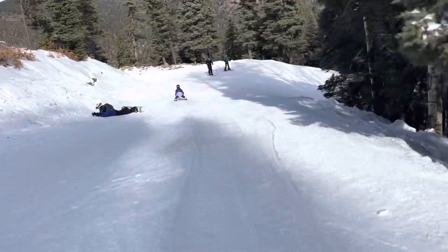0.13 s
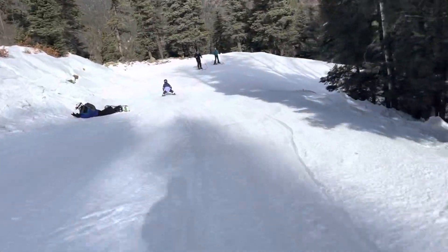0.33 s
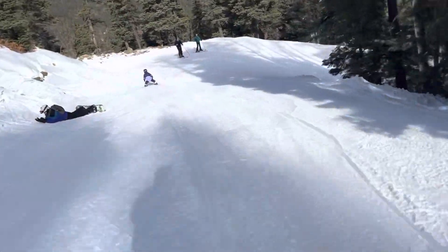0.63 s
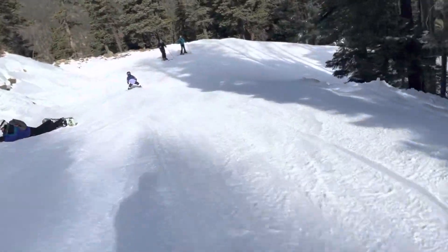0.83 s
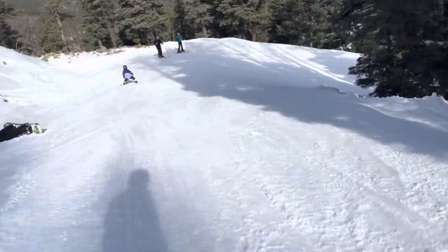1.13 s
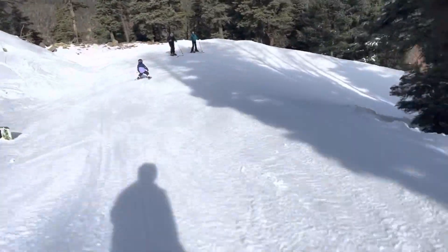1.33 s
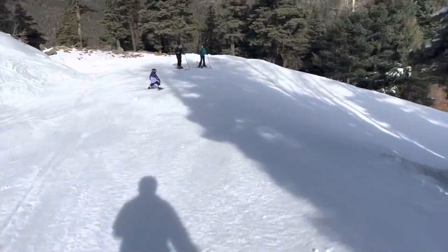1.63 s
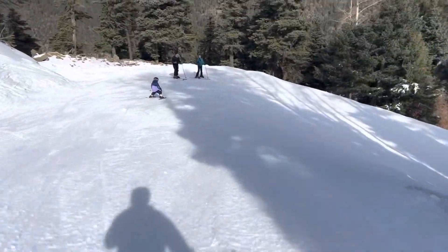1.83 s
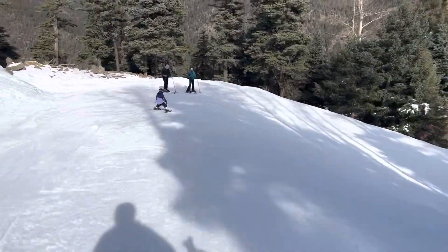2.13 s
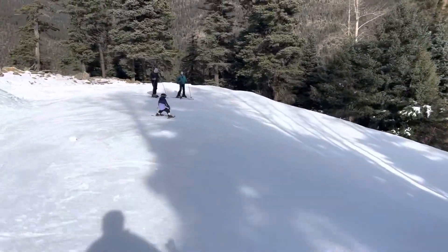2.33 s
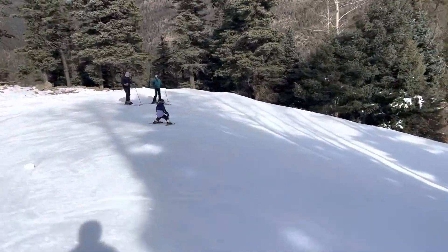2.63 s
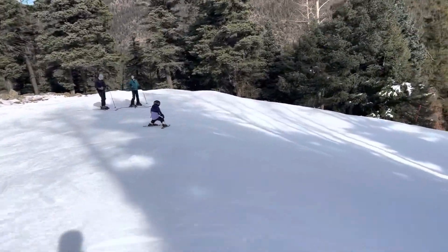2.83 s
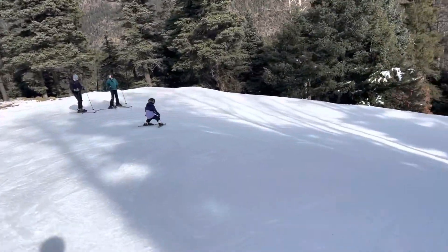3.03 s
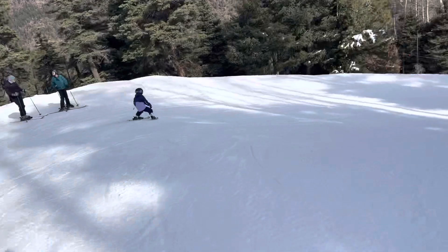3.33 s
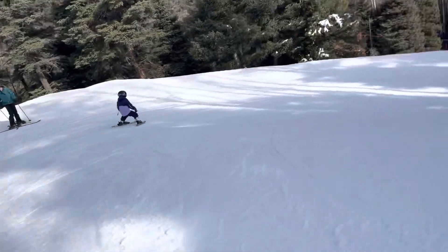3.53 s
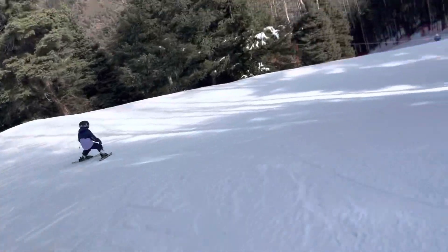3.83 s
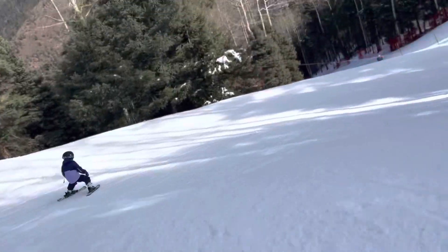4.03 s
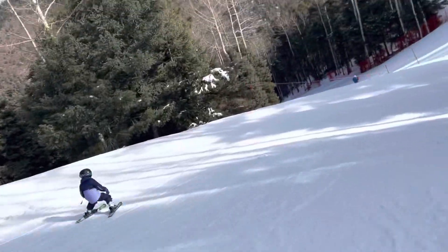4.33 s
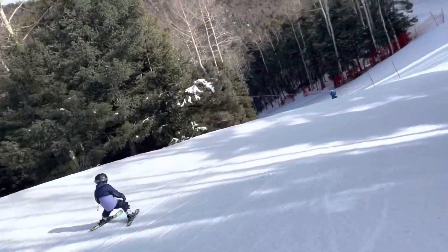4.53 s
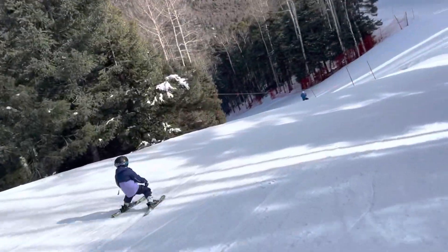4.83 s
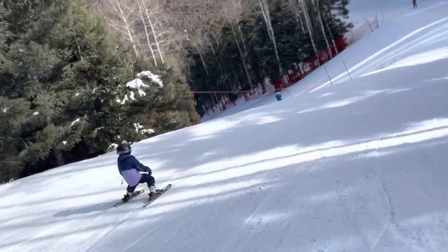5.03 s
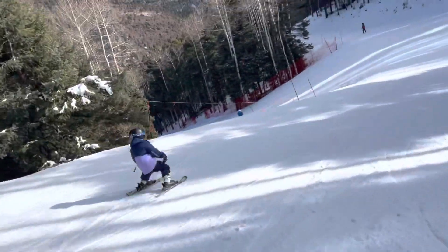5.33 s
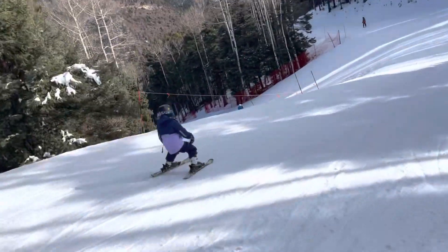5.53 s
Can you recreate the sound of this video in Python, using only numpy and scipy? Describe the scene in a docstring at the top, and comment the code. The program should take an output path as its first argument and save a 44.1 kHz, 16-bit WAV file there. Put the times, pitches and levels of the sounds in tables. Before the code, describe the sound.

Outdoors on a snowy slope, dry and close, heard through a hand-held stereo microphone carried by a skier. From 0 to 1.5 s skis hiss and scrape on grainy snow in short pressed turns, with dull hollow knocks on packed lumps around 0.6 to 1.15 s, crunchy edge bites and soft wind thumps. From about 1.7 s a longer skid builds, densest between 2.0 and 2.55 s, with coarse crunches, bright scratches and ice spray, while wind rises. From 2.7 to about 4.3 s wind dominates: a low rumbling, fluttering roar with hard buffets and abrupt rasps on the right; the skis are mostly a faint hiss, with a small gear clack near 3.55 s. The wind then dies away, with low thumps near 4.8 s. From 4.9 s to the end at about 5.7 s, strong gritty scraping returns, with crunches, a lump knock and thin icy squeaks around 5.2 to 5.3 s.

```python
"""Skis on grainy snow, wind at the microphone

Close by a hand-held camera with two microphone ports, skis hiss and scrape down a groomed slope: filtered
noise and grain clicks, pressed harder in each turn. They slap lumps (damped tones), bite on ridges (bursts
of coarse grain) and squeak on ice (narrow noise); hard bits click and gear clacks. Wind, two colours of
unsteady noise, buffets the ports, swells to a roar on the fast, flat-running stretch and dies away in the
last turn."""
import sys
import numpy as np
from scipy import signal
from scipy.fft import rfft, irfft
from scipy.io import wavfile
from scipy.ndimage import uniform_filter1d

SR = 44100
rng = np.random.default_rng(int(sys.argv[2]) if len(sys.argv) > 2 else 0)


def log_audio(samples):
    """Write samples as a 16-bit WAV file to the path given in sys.argv[1]."""
    # one column per channel
    frames = np.atleast_2d(samples).T
    # limit to full scale, then quantise
    limited = np.clip(frames, -1, 1)
    pcm = np.round(limited * 32767).astype(np.int16)
    wavfile.write(sys.argv[1], SR, pcm)


N = 250929
TIME, BINS = np.arange(N) / SR, np.fft.rfftfreq(N, 1 / SR)  # seconds, Hz

# strong single eddies that hit the microphone: t/s, slap level/dB, thump level/dB (relative)
EDDIES = [(0.084, -34, -21), (0.125, -33, -26), (0.237, -24, -22), (0.337, -24.5, -18), (0.472, -25.5, -17),
          (0.644, -17, -14), (0.777, -33, -21), (0.849, -21.5, -16), (1.089, -24.5, -25),
          (1.152, -24, -15.5), (1.271, -17, -13.5), (1.636, -24, -14.5), (1.656, -20, -32),
          (1.726, -25, -24), (1.84, -25, -20), (1.987, -12.5, -17), (2.307, -12.5, -13), (2.523, -18, -23),
          (2.879, -12, -34), (3.211, -21, -12), (4.756, -27, -11), (4.812, -26, -9.5), (5.321, -35, -15),
          (5.352, -31, -16)]


def gain_of(db):
    """Decibels to amplitude."""
    return 10 ** (np.asarray(db) / 20)


def evened(x):
    """Scales to rms 1 over all channels together."""
    return x / np.sqrt(np.mean(x ** 2) + 1e-20)


def read(points, hz):
    """A spectrum table on a log-frequency axis."""
    f, value = np.transpose(points)
    return np.interp(np.log(hz + 1), np.log(f), value)


def follow(rows, t):
    """The columns of a curve table at times t."""
    s, *columns = np.transpose(rows)
    return [np.interp(t, s, c) for c in columns]


def coloured(x, db):
    """Filters x by a gain for each frequency bin; rms 1."""
    return evened(irfft(rfft(x) * gain_of(db), N))


def band(x, hz, octaves):
    """Keeps a broad band of x around hz, with steep skirts; rms 1."""
    distance = np.log2((BINS + 1) / hz) / octaves
    return coloured(x, -20 * np.log10(1 + .42 * distance ** 4))


def narrow(hz, width_hz):
    """Noise in one sharp resonance, the same in both channels; rms 1."""
    return coloured(noise(channels=1), -20 * np.log10(1 + (2 * (BINS - hz) / width_hz) ** 2))


def split(x, hz):
    """The parts of x below and above hz."""
    low = irfft(rfft(x) / (1 + (BINS / hz) ** 4), N)
    return low, x - low


def ears(points):
    """A left-minus-right table as dB for each channel."""
    return np.array([[.5], [-.5]]) * read(points, BINS)


def noise(channels=2):
    """White noise for each channel."""
    return rng.standard_normal((channels, N))


def unrest(rate, depth_db, channels=1):
    """A random gain of mean power 1 that wanders up to about rate times a second, with little slow drift."""
    shape = BINS / (BINS + 8) / np.sqrt(1 + (BINS / rate) ** 4)
    wander = evened(irfft(rfft(noise(channels)) * shape, N))
    return evened(gain_of(depth_db * np.clip(wander, -2.5, 2.5)))


def patchy(x, depth_db, wide_hz, long_s):
    """Random patches of pitch and time stand out and sink back; rms 1."""
    z = signal.stft(x, SR, nperseg=512, noverlap=384)[2]
    bins = max(round(wide_hz * 512 / SR), 1)
    frames = max(round(long_s * SR / 128), 1)
    field = uniform_filter1d(rng.standard_normal(z.shape[1:]), bins, axis=0)
    field = uniform_filter1d(field, frames, axis=1)
    patched = z * gain_of(depth_db * evened(field))
    return evened(signal.istft(patched, SR, nperseg=512, noverlap=384)[1][:, :N])


def swell(s, length):
    """A smooth bump centred on s, length seconds wide at 1/e of its height."""
    return np.exp(-np.minimum((2 * (TIME - s) / length) ** 2, 50))


def wind(fray_hz=720, fray_growth=0.21, full_speed_db=-18.0, wake_db=-10, wake_s=0.042):
    """Large eddies rumble and smaller ones flutter; the smallest come in spurts and grow with air speed."""
    # air stream at the microphone, strongest on the fast stretch: t/s, rumble level/dB, flutter level/dB
    air_stream = [(0.0, -44, -47), (0.1, -33.5, -39), (0.55, -32, -41), (0.7, -32.5, -33.5),
                  (1.27, -32.5, -31), (1.33, -38, -49), (1.52, -35, -52), (1.64, -31, -36),
                  (1.8, -29.5, -32.5), (1.85, -30.5, -23.5), (2.45, -26.5, -27), (3.0, -17.5, -16),
                  (3.5, -17.5, -17), (4.1, -21, -20.5), (4.35, -19, -25.5), (4.83, -24, -33.5),
                  (5.0, -31.5, -39), (5.36, -29, -38.5), (5.62, -37, -39), (5.69, -55, -49)]
    # gusts that surge out of the stream: t/s, length/s, rumble level/dB, flutter level/dB
    gusts = [(0.3, 0.13, -30, -35), (0.713, 0.073, -26, -45), (0.86, 0.074, -24.5, -32),
             (2.415, 0.027, -20, -21), (2.7, 0.06, -16, -21), (2.818, 0.018, -9, -16.5),
             (2.92, 0.033, -20, -23), (2.98, 0.094, -17, -20.5), (3.188, 0.062, -22, -15.5),
             (3.213, 0.039, -11.5, -23), (3.265, 0.035, -21, -11.5), (3.342, 0.021, -17, -14),
             (3.399, 0.045, -16, -13.5), (3.47, 0.077, -13, -15), (3.512, 0.035, -12, -20),
             (3.599, 0.075, -14, -18), (3.66, 0.067, -17.5, -14), (3.77, 0.045, -22, -16),
             (3.844, 0.03, -13, -18), (3.902, 0.073, -24, -19), (3.961, 0.035, -22, -18.5),
             (4.027, 0.019, -12, -16), (4.147, 0.12, -18, -23), (4.83, 0.055, -29, -25)]
    # colour of the rumble and of the flutter: f/Hz, level/dB
    rumble_colour, flutter_colour = [(15, -42), (30, -11), (48, 0.5), (72, 3), (120, 1.5), (190, -3),
                                     (300, -18), (600, -56)], [(90, -8), (190, 4.5), (290, 6), (450, 0.5),
                                                     (650, -4.5), (1000, -17), (1500, -23), (2500, -38.5),
                                                     (5000, -80), (12000, -74)]
    # side on which the flutter is heard: f/Hz, left minus right/dB
    flutter_side = [(300, -0.5), (420, -4), (560, 6), (740, -3), (950, -10.5), (1200, 0), (2500, -1)]

    stream = np.array(follow(air_stream, TIME))
    surge = sum(gain_of(levels)[:, None] * swell(s, length) for s, length, *levels in gusts)
    # each buffet also stirs the air around it
    stirred = sum(gain_of([[thump], [slap]]) * swell(s, wake_s) for s, slap, thump in EDDIES)
    wake = gain_of(wake_db) * stirred
    rumble_force, flutter_force = np.sqrt(gain_of(stream) ** 2 + surge ** 2 + wake ** 2)

    rumble = coloured(noise(), read(rumble_colour, BINS)) * unrest(rate=47, depth_db=2.5)
    flutter = coloured(noise(), read(flutter_colour, BINS) + ears(flutter_side))
    flutter = flutter * unrest(rate=350, depth_db=2.5)
    body, fine = split(flutter, fray_hz)
    spurts = unrest(rate=80, depth_db=3.0, channels=2)
    fray = fine * spurts * gain_of(fray_growth * (stream[1] - full_speed_db))
    return rumble_force * rumble + flutter_force * (body + fray)


def buffets(slap_db=-3, slap_hz=280, slap_s=0.019, thump_db=1, thump_hz=78, thump_s=0.0051, lag_s=0.0077):
    """Each eddy slaps the ports with a burst of noise, and a brief pressure swing follows as it passes."""
    slap_force = sum(gain_of(db) * swell(s, slap_s) for s, db, _ in EDDIES)
    slap = slap_force * band(noise(), slap_hz, octaves=0.55)
    thump = np.zeros(N)
    for (s, _, db), (size, turn) in zip(EDDIES, rng.random((len(EDDIES), 2))):
        hz = thump_hz * 2 ** (size - .5)  # up to half an octave either way
        swing = np.sin(2 * np.pi * (hz * (TIME - s) + turn))
        thump += gain_of(db) * swell(s + lag_s, thump_s) * swing
    return gain_of(slap_db) * slap + gain_of(thump_db) * thump


def rips(level_db=-10.5, left_db=-13, rise_s=0.0029):
    """Fast air tears across the right port in short, abrupt rasps, some dull and some bright."""
    # eddies that tear at the right port: t/s, relative level/dB, centre f/Hz
    tears = [(2.778, -13.5, 1140), (2.852, -14, 1230), (2.87, -16, 600), (2.926, -11, 700),
             (2.965, -2, 600), (3.035, -7, 920), (3.122, -4.5, 1100), (3.163, -8, 950), (3.183, -5, 760),
             (3.213, -5.5, 950), (3.266, -15, 1050), (3.324, -5.5, 850), (3.387, -3, 800), (3.477, -8, 645),
             (3.62, -15, 700), (3.648, -15, 895), (3.683, -8, 750), (3.782, -8.5, 800), (3.869, -18, 1400),
             (3.887, -6.5, 600), (3.986, -5.5, 800), (4.068, -12, 900), (4.16, -9, 700)]
    out, air = np.zeros(N), noise(channels=1)
    for s, db, hz in tears:
        span = slice(round(s * SR), round((s + 12 * rise_s) * SR))
        age = np.maximum(TIME[span] - s, 0) / rise_s
        envelope = age * np.exp(1 - age)  # fades over a few times its rise
        port = signal.butter(3, [hz / 2, hz * 2], "bandpass", fs=SR, output="sos")
        # the membrane is driven to its limit
        limited = np.tanh(evened(signal.sosfilt(port, air[0, span])))
        out[span] += gain_of(db) * envelope * evened(signal.sosfilt(port, limited))
    return out * gain_of(level_db) * gain_of([[left_db], [0]])


def knocks(level_db=-11, contact_s=0.0028, crack_db=-4, crack_hz=4500):
    """Ski gear clacks together and bounces: a gritty contact that cracks and briefly rings the gear."""
    # blows: t/s, relative level/dB
    blows = [(3.551, -12.3), (3.5576, -21)]
    # what the gear rings with: f/Hz, relative level/dB, t60/s
    gear_modes = [(1400, 14, 0.027), (2040, 7.5, 0.017), (2420, 12, 0.021), (2680, 5.5, 0.028),
                  (3160, 6, 0.026), (4110, 2, 0.028), (4470, -5, .014), (5230, -1, 0.095),
                  (5870, -11, 0.027), (7160, -19, 0.0073), (7950, 8, 0.011), (11100, 1, 0.0054)]
    contact = sum(gain_of(db) * swell(s, contact_s) for s, db in blows)
    crack = contact * band(noise(), crack_hz, octaves=0.56)

    t = TIME[:4000]
    ring = np.zeros((2, len(t)))
    phases = rng.uniform(0, 2 * np.pi, (len(gear_modes), 2, 1))
    for (hz, db, t60), phase in zip(gear_modes, phases):
        decay = np.exp(-np.log(1000) * t / t60)
        ring += gain_of(db) * decay * np.sin(2 * np.pi * hz * t + phase)
    impulses = np.zeros(N)
    for s, db in blows:
        impulses[round(s * SR)] += gain_of(db)
    rung = signal.oaconvolve(impulses[None], ring)[:, :N]
    return gain_of(level_db) * rung + gain_of(crack_db) * crack


def clicks(level_db=-3):
    """Each hard bit on the skis gives a bright snap of noise that dies within milliseconds."""
    # hard bits: t/s, relative level/dB, centre f/Hz, t60/s
    hard_bits = [(0.947, -16.5, 10200, 0.018), (2.252, -20, 3400, 0.013), (2.425, -14, 2900, 0.015),
                 (3.039, -23, 5650, 0.016), (3.125, -24.5, 4500, 0.022), (3.203, -22, 5050, 0.01),
                 (3.78, -22, 4900, 0.019), (4.9225, -26, 5460, 0.016), (5.0813, -19.5, 5060, 0.021)]
    out = np.zeros((2, N))
    for s, db, hz, t60 in hard_bits:
        age = np.maximum(TIME - s, 0)
        decay = (TIME >= s) * np.exp(-np.minimum(np.log(1000) * age / t60, 50))
        out += gain_of(db) * decay * band(noise(), hz, octaves=0.45)
    return gain_of(level_db) * out


def bumps(rise_s=0.0022, hollow_ratio=1.56, hollow_db=-8):
    """A ski slaps a lump of packed snow: a dull two-tone knock that the snow damps at once."""
    # lumps: t/s, level/dB, pitch f/Hz
    lumps = [(0.631, -18, 623), (0.709, -20, 455), (0.842, -23, 470), (0.903, -23, 790),
             (1.146, -18.5, 610), (5.338, -17, 650)]
    out, t = np.zeros(N), TIME[:2000]
    shape = t / rise_s * np.exp(1 - t / rise_s)
    for (s, db, hz), (first, second) in zip(lumps, rng.random((len(lumps), 2))):
        knock = np.sin(2 * np.pi * (hz * t + first))
        hollow = np.sin(2 * np.pi * (hollow_ratio * hz * t + second))
        out[round(s * SR):][:len(t)] += gain_of(db) * shape * (knock + gain_of(hollow_db) * hollow)
    return out


def squeaks(width_hz=260, left_db=-6):
    """A loaded edge sticks and slips on ice in thin, bright rasps of narrow noise, stronger on the right."""
    # rasps: t/s, length/s, pitch f/Hz, level/dB on the right
    icy_rasps = [(5.222, 0.028, 5030, -31), (5.248, 0.016, 5080, -29.5), (5.292, 0.021, 5700, -30),
                 (5.325, 0.016, 5730, -35)]
    rasps = sum(gain_of(db) * swell(s, length) * narrow(hz, width_hz) for s, length, hz, db in icy_rasps)
    return rasps * gain_of([[left_db], [0]])


def grains(per_s, spread_db):
    """Snow crystals break: a random train of clicks, most near the smallest size and a few larger; rms 1."""
    size = gain_of(spread_db * np.minimum(rng.exponential(1, (2, N)), 4))
    return evened(size * np.sign(noise()) * (rng.random((2, N)) < per_s / SR))


def friction(press_curve=0.4, release_s=0.13):
    """Strength of the hiss and of the low scrape: each turn presses, holds and releases over the flat run."""
    # skis running flat between turns: t/s, friction level/dB
    flat_run = [(0, -41.5), (1.55, -40), (2.7, -39.5), (2.9, -41), (3.35, -42), (4.9, -41.5)]
    # the edges are set and skid: start t/s, length/s, time to full pressure/s, friction level/dB,
    # extra low scrape/dB
    turns = [(0.09, 0.41, 0.031, -46, 8.5), (0.537, 0.37, 0.07, -37.5, 3), (0.8, 0.55, 0.056, -32.5, 3),
             (1.22, 0.29, 0.088, -36, 4), (1.667, 0.99, 0.61, -28.5, 0.2), (3.47, 0.48, 0.26, -34, 0.5),
             (3.87, 1, 0.03, -37, -2), (4.402, 0.6, 0.4, -39, 5), (4.915, 0.23, 0.0072, -35, 2.5),
             (5.029, 0.44, 0.57, -27, 1.4), (5.37, 0.42, 0.3, -31, 1)]
    hiss = scrape = gain_of(follow(flat_run, TIME)[0]) ** 2
    for start, length, press_s, db, edging_db in turns:
        # pressure builds quickly at first, then lets go as the skis flatten
        press = np.clip((TIME - start) / press_s, 0, 1) ** press_curve
        release = np.clip((start + length - TIME) / release_s, 0, 1)
        skid = gain_of(db) * press * release
        hiss = hiss + skid ** 2
        scrape = scrape + (gain_of(edging_db) * skid) ** 2
    return np.sqrt(hiss), np.sqrt(scrape)


def crumbs(level_db=-13, centre_hz=2800, crush_s=0.0043):
    """Now and then a frozen crumb is crushed in a short puff of noise, loudest under a loaded edge."""
    _, scrape_level = friction()
    keep = np.exp(-1 / (crush_s * SR))
    crush = signal.lfilter([1], np.poly([keep, keep]), abs(grains(per_s=79, spread_db=12)))
    return gain_of(level_db) * scrape_level * band(crush * noise(), centre_hz, octaves=0.93)


def ski_body(drive):
    """Friction passes through skis and snow and reaches the two ports; rms 1."""
    # colour of ski on snow: f/Hz, level/dB
    snow_colour = [(100, -39), (300, -5.5), (480, 0), (720, 1.5), (1100, 1.5), (1500, -4.5), (1850, -6),
                   (2400, -11), (3500, -12), (5000, -12.5), (8000, -16.5), (11000, -8), (13000, -14.5),
                   (16000, -13.5)]
    # resonances and hollows that colour the scrape: f/Hz, width/Hz, level/dB
    resonances = [(540, 116, -2.5), (617, 93, 4.5), (1230, 100, 1.5), (1482, 47, 6), (2770, 130, 3),
                  (5010, 38, 4.5)]
    # where the skis are heard: f/Hz, left minus right/dB
    ski_side = [(400, -1.5), (700, -3), (1100, 0), (2200, 1.5), (3100, -1.5), (4300, -6.5), (5400, -12),
                (6700, -1.5), (8000, -12)]
    # likeness of the two channels: f/Hz, correlation (-1 to 1)
    ski_same = [(250, 0.5), (400, -0.23), (510, -0.87), (590, -0.89), (700, -0.12), (900, 0.19),
                (1250, 0.38), (1950, 0.45), (2900, 0.11), (5600, -0.019), (7200, 1), (8400, -0.56)]
    same = np.clip(read(ski_same, BINS), -.99, .99)
    left, other = rfft(drive)
    right = same * left + np.sqrt(1 - same ** 2) * other
    pair = irfft(np.array([left, right]), N)
    rings_db = sum(db / (1 + (2 * (BINS - hz) / width) ** 2) for hz, width, db in resonances)
    return coloured(pair, read(snow_colour, BINS) + rings_db + ears(ski_side))


def bites(spray_db=4.5, crunch_hz=1350, scratch_hz=2800, spray_hz=5800):
    """An edge judders across a ridge: a burst of coarse crunch, a scratch on top and a spray of ice."""
    # ridges: t/s, length/s, crunch level/dB, scratch level/dB, relative spray level/dB
    ridges = [(0.318, 0.028, -30, -42.5, -54), (0.73, 0.021, -22, -40, -43), (0.87, 0.066, -30, -57, -57),
              (1.014, 0.022, -26, -33, -36), (1.19, 0.023, -25, -41, -50), (1.278, 0.057, -26, -39, -52),
              (1.37, 0.13, -29.5, -39, -43), (1.568, 0.023, -27, -43, -46), (2.01, 0.11, -24, -54, -42),
              (2.082, 0.0097, -20.5, -46, -48), (2.127, 0.044, -19.5, -32, -34.5),
              (2.172, 0.037, -24, -29, -40), (2.249, 0.016, -21, -21.5, -34), (2.292, 0.012, -31, -35, -48),
              (2.31, 0.019, -20.5, -26.5, -47), (2.35, 0.035, -28, -39, -49), (2.414, 0.017, -21, -31, -35),
              (2.433, 0.029, -16, -29, -31), (2.473, 0.025, -23, -38, -35), (2.532, 0.091, -27, -36, -41),
              (3.694, 0.026, -29, -40, -38), (3.783, 0.043, -28, -38, -43), (4.049, 0.09, -45, -43, -38.5),
              (4.697, 0.067, -34, -39, -45), (4.775, 0.017, -55, -32.5, -43), (4.968, 0.035, -23, -35, -34),
              (5.015, 0.032, -30, -31.5, -39), (5.152, 0.039, -31, -35, -40),
              (5.245, 0.014, -25.5, -38, -32), (5.294, 0.024, -25, -32, -38), (5.321, 0.027, -25, -34, -36),
              (5.378, 0.065, -27, -34.5, -41), (5.606, 0.011, -34, -27, -45)]
    judder = unrest(rate=330, depth_db=2.6)
    coarse = ski_body(judder * grains(per_s=1900, spread_db=0.3))
    crunch, scratch, spray = sum(gain_of(levels)[:, None] * swell(s, length)
                                 for s, length, *levels in ridges)
    return (crunch * band(coarse, crunch_hz, octaves=0.46)
            + scratch * band(coarse, scratch_hz, octaves=0.41)
            + gain_of(spray_db) * spray * band(coarse, spray_hz, octaves=0.52))


def ski_ring(level_db=-44, ring_hz=1475, width_hz=110):
    """The skis keep ringing faintly as they run, also between turns."""
    return gain_of(level_db) * narrow(ring_hz, width_hz) * unrest(rate=5.7, depth_db=7.0)


def skis(scrape_db=8.0, hiss_db=7.5, split_hz=2600, grainy=0.54):
    """The edges chatter in a clumpy low scrape while the bases hiss more evenly, both through the skis."""
    hiss_level, scrape_level = friction()
    rough = noise() + grainy * grains(per_s=2500, spread_db=3.5)
    low, high = split(rough, split_hz)
    clumps = low.std() * patchy(low, depth_db=3.0, wide_hz=350, long_s=0.017)
    chatter = clumps * unrest(rate=150, depth_db=1.6)
    rush = high * unrest(rate=86, depth_db=0.96)
    scrape, hiss = split(ski_body(chatter + rush), split_hz)
    return gain_of(scrape_db) * scrape_level * scrape + gain_of(hiss_db) * hiss_level * hiss


def centred(x):
    """Below a moving pitch the bass of the whole sound draws to the centre."""
    # pitch below which the channels merge: t/s, f/Hz
    merge_pitch = [(1.76, 60), (1.82, 574), (3.5, 640), (4.4, 350), (4.9, 188), (5.6, 140)]
    hz, t, (left, right) = signal.stft(x, SR, nperseg=1024, noverlap=768)
    apart = 1 - 1 / (1 + (hz[:, None] / follow(merge_pitch, t)[0]) ** 5)
    mid, side = (left + right) / 2, apart * (left - right) / 2
    pair = np.array([mid + side, mid - side])
    return signal.istft(pair, SR, nperseg=1024, noverlap=768)[1][:, :N]


def scene(air_db=4.0):
    """Skis below, wind at the microphone."""
    # the skis drift to the right as the camera swings round: t/s, left minus right/dB
    camera_swing = [(0, 1.4), (3.5, 1.1), (5.69, -0.5)]
    snow = skis() + ski_ring() + bites() + squeaks() + bumps() + crumbs() + clicks() + knocks()
    swing = gain_of(np.array([[.5], [-.5]]) * follow(camera_swing, TIME)[0])
    air = gain_of(air_db) * (wind() + buffets()) + rips()
    return centred(swing * snow + air)


def record(dry, ceiling=1.0, low_cut_hz=32, top_shared_hz=8600, top_delay_s=.000208, edge_hz=15900):
    """Cuts the deepest bass, makes the treble one signal, rounds the peaks and limits the band."""
    left, right = rfft(dry) * (1 - 1 / (1 + (BINS / low_cut_hz) ** 6))
    # the top is shared: the right carries the left's, inverted and delayed
    shared = np.clip((BINS - top_shared_hz) / 600 + .5, 0, 1)
    delayed = left * np.exp(-2j * np.pi * BINS * top_delay_s)
    right = np.sqrt(1 - shared) * right - np.sqrt(shared) * delayed
    wide = irfft(np.array([left, right]), N)
    rounded = wide / (1 + (wide / ceiling) ** 6) ** (1 / 6)
    lowpass = signal.firwin(511, edge_hz, window=("kaiser", 9), fs=SR)
    return signal.oaconvolve(rounded, lowpass[None], "same")


dry = scene()
out = record(dry)
log_audio(out)
```